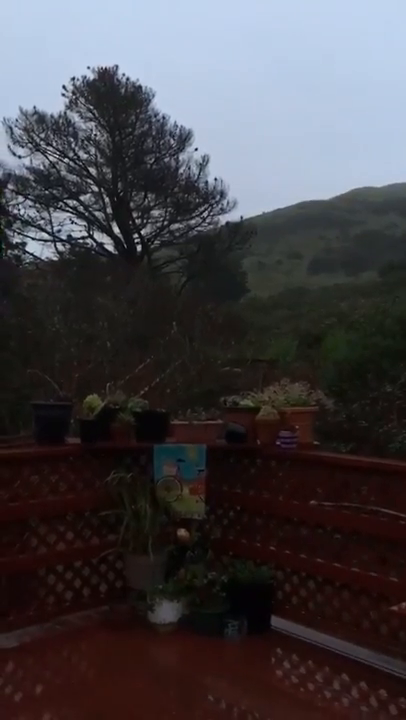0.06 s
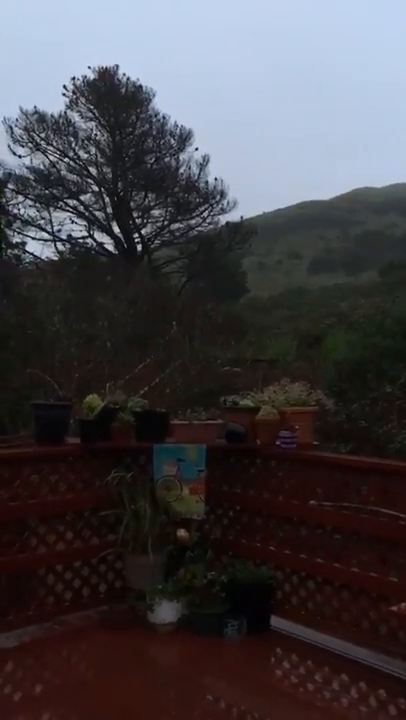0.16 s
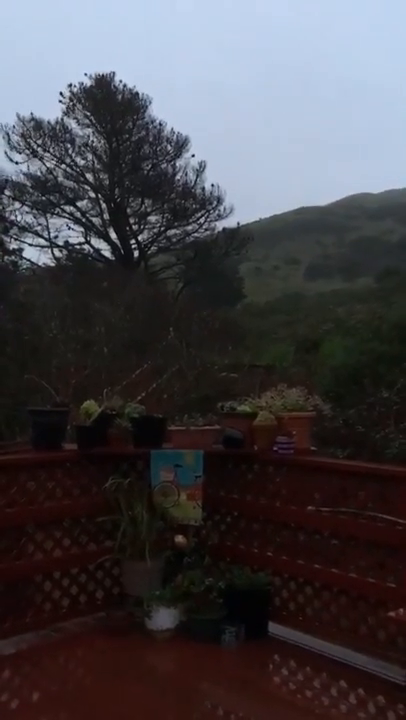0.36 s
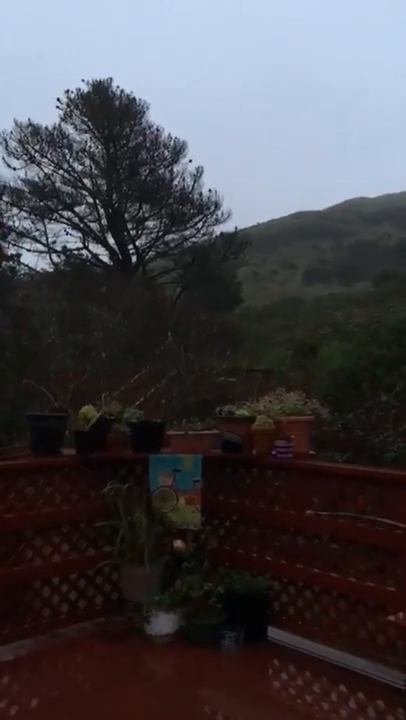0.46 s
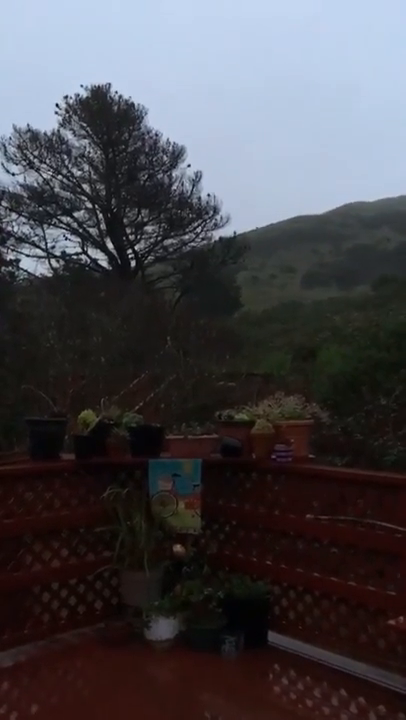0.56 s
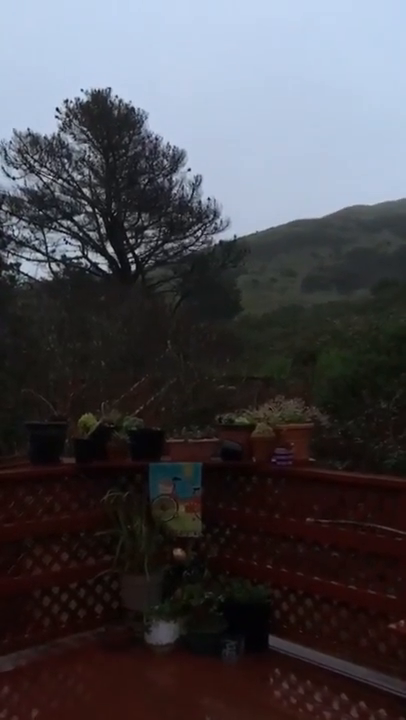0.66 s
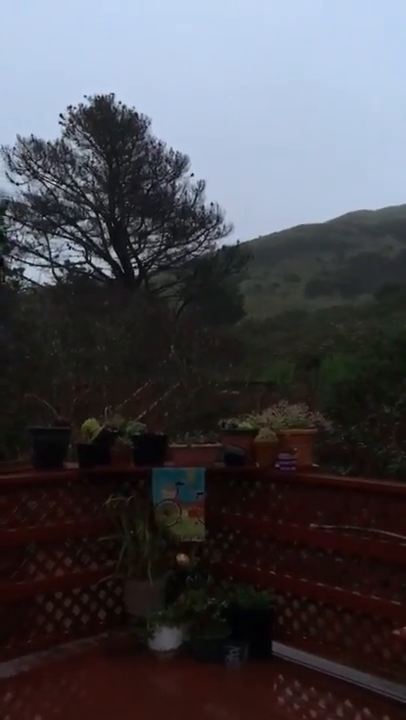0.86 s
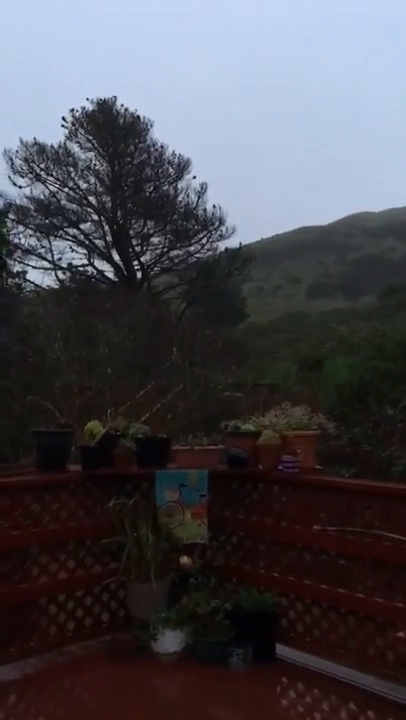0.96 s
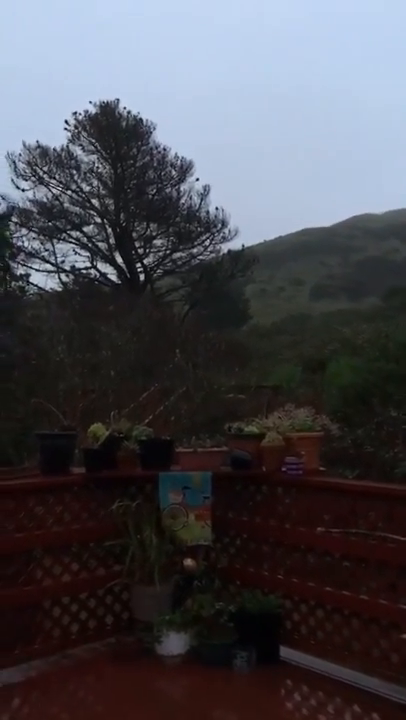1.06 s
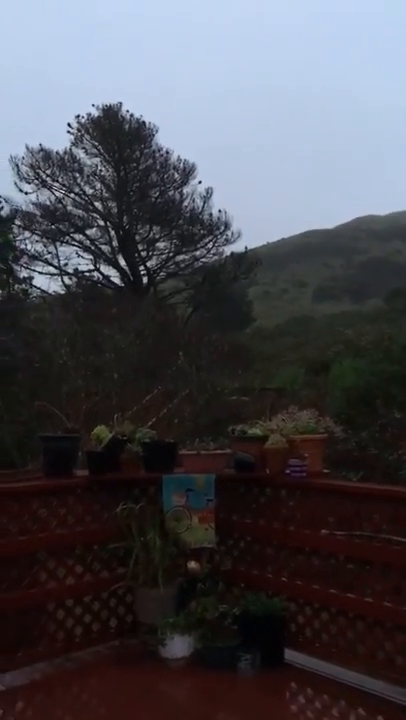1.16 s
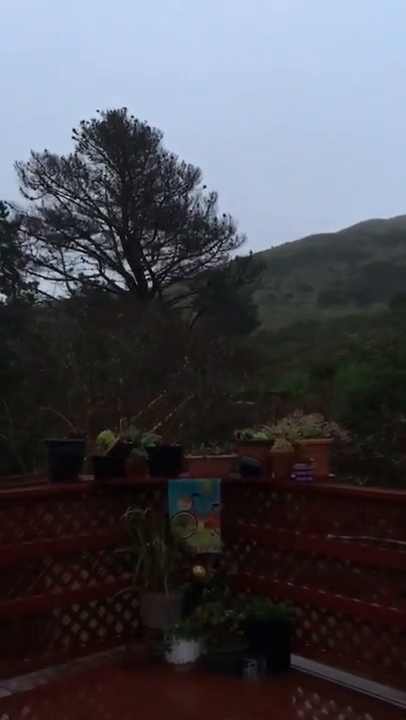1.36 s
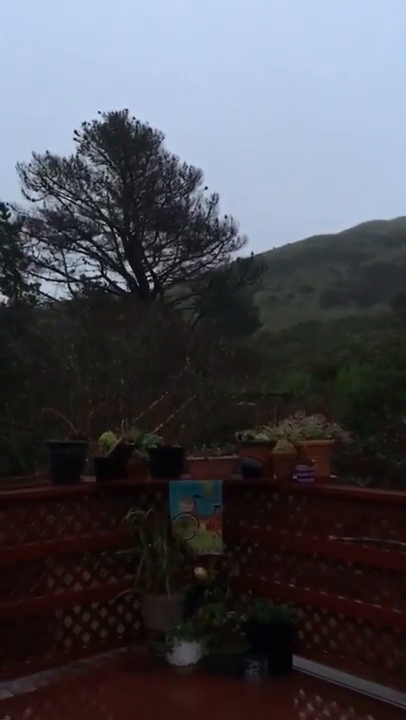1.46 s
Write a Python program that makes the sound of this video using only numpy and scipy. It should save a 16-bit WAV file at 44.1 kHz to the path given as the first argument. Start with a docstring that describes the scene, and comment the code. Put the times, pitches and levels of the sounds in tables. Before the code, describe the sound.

A distant coyote gives one rough bark and a short high howl over steady outdoor hiss.

```python
"""Steady rumble and hiss of open air, then a coyote's one rough bark and a howl across a brushy valley.
Its vocal folds beat unevenly, so the howl opens hoarse and wavering; it cracks, holds a clean high note
and drops away in a yip. The microphone is on a deck, with a faint house hum, a few faint ticks and
a thin high chirp as the bark starts. Deck and trees scatter the call; the hills keep the note ringing."""
import sys
import numpy as np
from scipy import signal
from scipy.fft import rfft, irfft
from scipy.io import wavfile
from scipy.ndimage import uniform_filter1d

SR = 44100
rng = np.random.default_rng(int(sys.argv[2]) if len(sys.argv) > 2 else 0)


def pcm_store(signal):
    """Save signal as 16-bit PCM."""
    levels = np.round(np.clip(np.atleast_2d(signal), -1, 1) * 32767)
    wavfile.write(sys.argv[1], SR, levels.astype(np.int16).T)


N = 66150
T = np.arange(N) / SR


def amp(db):
    """Decibels to amplitude."""
    return 10 ** (np.asarray(db) / 20)


def unit(x):
    """Scales to rms 1."""
    return x / np.sqrt(np.mean(abs(x) ** 2) + 1e-20)


def curve(rows, column=1):
    """One column of a table, joined by straight lines in time."""
    rows = np.array(rows)
    return np.interp(T, rows[:, 0], rows[:, column])


def gain_at(spectrum, hz):
    """Gain of a spectrum table at these frequencies."""
    freq_hz, db = np.transpose(spectrum)
    return amp(np.interp(np.log(hz + 1), np.log(freq_hz + 1), db))


def colour(x, spectrum):
    """Filters by a spectrum table."""
    return irfft(rfft(x) * gain_at(spectrum, np.fft.rfftfreq(len(x), 1 / SR)), len(x))


def wander(hz):
    """Random drift up to about this rate, rms 1."""
    lowpass = np.exp(-.5 * (np.fft.rfftfreq(N, 1 / SR) / hz) ** 2)
    return unit(irfft(rfft(rng.standard_normal(N)) * lowpass, N))


def drifting_phase(hz, drift, drift_hz):
    """Phase of a vibration whose rate strays by the fraction `drift`."""
    return 2 * np.pi * np.cumsum(hz * (1 + drift * wander(drift_hz))) / SR


def gate(rows):
    """1 between the first and last row, with soft edges."""
    return uniform_filter1d(1. * ((T > rows[0][0]) & (T < rows[-1][0])), size=200)


# Open air at the microphone: freq_hz, gain_db
AIR_SPECTRUM = [(18, -33), (43, -1.5), (140, -6), (250, -6.5), (504, -16.5), (800, -13.5), (1220, -15.5),
                (1820, -19), (2380, -17.5), (2750, -25), (3500, -25), (9000, -35.5), (11700, -51)]
def open_air(level_db=-53.5, swell_db=2.5):
    """Uneven low rumble under a steady hiss, all around the deck."""
    air = amp(level_db) * unit(colour(rng.standard_normal(N), AIR_SPECTRUM))
    rumble = signal.sosfiltfilt(signal.butter(2, 294, fs=SR, output="sos"), air)
    hiss = air - rumble
    return rumble * amp(swell_db * wander(hz=8.9)) + hiss


# Hum as it reaches the deck: freq_hz, level_db
HUM_TONES = [(57, -70), (114, -65), (240, -66)]
def house_hum():
    """Faint, wavering low tones from the house."""
    return sum(amp(db) * np.sqrt(2) * np.cos(2 * np.pi * hz * T + 0.6 * wander(hz=5.5))
               for hz, db in HUM_TONES)


# Brief high sounds at the microphone: start_s, level_db, centre_hz, width_hz, decay_s
TREBLE_BURSTS = [(0.095, -60, 5520, 5000, 0.036), (0.182, -61.5, 3740, 550, 0.061),
                 (0.977, -64.5, 7540, 900, 0.04), (1.319, -60.5, 6547, 3000, 0.019)]
def treble_bursts():
    """Faint ticks, and a faint, narrow high chirp at the start of the bark."""
    out = np.zeros(N)
    for start_s, level_db, centre_hz, width_hz, decay_s in TREBLE_BURSTS:
        envelope = (T > start_s) * np.exp(-abs(T - start_s) / decay_s)
        band = unit(wander(width_hz / 2) * np.cos(2 * np.pi * centre_hz * T))
        out += amp(level_db) * envelope * band
    return out


def scatter(x, t60_s, rise_s):
    """A diffuse tail of many small reflections."""
    tail = rng.standard_normal(N) * amp(-60 * T / t60_s) * (1 - np.exp(-(T / rise_s) ** 2))
    return signal.fftconvolve(x, tail / np.linalg.norm(tail))[:N]


# Scatter off the deck and trees near the microphone: freq_hz, gain_db
DECK_SPECTRUM = [(500, -19.5), (800, 0), (1250, -19), (1650, -12), (2500, -10)]
# What the far hills send back, mostly the fundamental: freq_hz, gain_db
HILL_SPECTRUM = [(500, -4), (650, -19.5), (800, -0.5), (1000, -41), (1270, -29.5), (1620, -25), (2450, -21),
                 (4000, -59)]
# Hillside echoes: delay_s, gain_db
HILL_ECHOES = [(.12, -0.5), (.222, -10.5)]
def valley(call):
    """The call reaches the deck directly, then as near scatter, far echoes and a long ring."""
    far = colour(call, HILL_SPECTRUM)
    echoes = sum(amp(db) * np.interp(T - delay_s, T, far, left=0) for delay_s, db in HILL_ECHOES)
    ring = amp(1.5) * scatter(far, t60_s=3.5, rise_s=0.052)
    near = scatter(colour(call, DECK_SPECTRUM), t60_s=0.43, rise_s=0.0048)
    return call + near + echoes + ring


# Fundamental against the second harmonic, at the folds: time_s, gain_db
FUNDAMENTAL = [(.21, 9.5), (.235, 9), (.265, -5.5), (.45, 6), (.48, -7), (.53, -6), (.58, 20), (.6, 8.5),
               (.625, -2), (.665, -16.5), (.697, 8.5), (.72, -4.5), (.85, 0.5), (.94, -1.5), (1.01, -16.5),
               (1.135, 7.5), (1.16, -18), (1.19, -11)]
# Overtones from the third harmonic up: time_s, gain_db
OVERTONES = [(.2, -2.5), (.22, 0.5), (.26, -3), (.45, -1), (.52, -7), (.57, 10.5), (.618, -10.5),
             (.69, 1.5), (.735, -1.5), (.87, 4), (1.06, 4.5), (1.14, 0.5), (1.156, -2.5), (1.187, -4)]
# Alternating strong and weak beats add lines half way between harmonics: time_s, gain_db
PERIOD_DOUBLING = [(.21, -8), (.25, -5), (.4, -14), (.425, -0.5), (.46, -1.5), (.478, -4.5), (.5, 5),
                   (.535, -3.5), (.56, 0.5), (.58, -18), (.615, -41), (1.15, -53.5), (1.187, -13)]
# The mouth changes shape at the crack: time_s, clear_share (0 hoarse to 1 clear)
MOUTH_SHAPE = [(.57, 0), (.62, 1)]
# Throat and mouth in the bark and hoarse opening: freq_hz, gain_db
HOARSE_THROAT = [(350, -52), (560, -5), (850, -15.5), (1120, -1.5), (1270, 4.5), (1580, -0.5), (1800, -4.5),
                 (1970, -10.5), (2420, -9.5), (2570, -23.5), (3000, -44.5), (4500, -72)]
# Throat and mouth in the clean note and yip: freq_hz, gain_db
CLEAR_THROAT = [(790, -12.5), (1050, -7), (1270, 2), (1600, 0), (1950, -20.5), (2420, -10), (2620, -10),
                (3080, -58), (4500, -80.5)]
def vocal_folds(pitch_hz, phase, roughness, rasp_db=-1.5, rasp_hz=113):
    """Harmonics and half lines of the beating folds, shaped by the throat and mouth."""
    fundamental, overtones = amp(curve(FUNDAMENTAL)), amp(curve(OVERTONES))
    doubling = amp(curve(PERIOD_DOUBLING))
    clear = np.clip(curve(MOUTH_SHAPE), 0, 1)
    out = np.zeros(N)
    for k in np.arange(2, 12) / 2:
        hz = k * pitch_hz
        throat = (1 - clear) * gain_at(HOARSE_THROAT, hz) + clear * gain_at(CLEAR_THROAT, hz)
        strength = fundamental if k == 1 else overtones if k >= 3 else 1
        gain = strength * (doubling if k % 1 else 1) * throat
        depth = amp(rasp_db) * roughness * (k / 2) ** 2  # high partials break up first
        rasp = (1 + depth * (wander(rasp_hz) + 1j * wander(rasp_hz))) / np.sqrt(1 + 2 * depth ** 2)
        partial = np.exp(1j * (k * phase + 2 * np.pi * rng.random()))
        out += np.sqrt(2) * gain * (rasp * partial).real
    return out


JITTER_HZ, FLUTTER_HZ = 121, 121.74
def voice(pitch_hz, effort_db, roughness):
    """The coyote's voice: roughness adds jitter, rasp, pulsed breath and the flutter of loose tissue."""
    phase = drifting_phase(pitch_hz, drift=0.0302 * roughness, drift_hz=JITTER_HZ)
    tone = vocal_folds(pitch_hz, phase, roughness)
    breath = unit(colour((1 + np.cos(phase)) * rng.standard_normal(N), HOARSE_THROAT))
    flap_phase = drifting_phase(FLUTTER_HZ, drift=0.11, drift_hz=FLUTTER_HZ / 2)
    flutter = 1 + 0.42 * roughness * np.cos(flap_phase)
    return amp(effort_db) * flutter * (tone + roughness * breath)


# The bark, from across the valley: time_s, pitch_hz, effort_db, roughness (0-1)
BARK_SHAPE = [(.186, 640, -60, 0.61), (.194, 640, -51.5, 0.48), (.208, 547.5, -49, 0),
              (.228, 626.2, -43, 0.28), (.248, 640, -39.5, 0.26), (.266, 662.2, -36.5, 0.5),
              (.277, 611, -38.5, 0.5), (.289, 665, -48, 0.77), (.299, 668, -44, 0.8), (.332, 661, -68.5, 1)]
def bark():
    """One short, rough burst of voice."""
    return gate(BARK_SHAPE) * voice(curve(BARK_SHAPE), curve(BARK_SHAPE, 2), curve(BARK_SHAPE, 3))


# Lines between the harmonics in the crack: pitch_multiple, gain_db
CRACK_PARTIALS = [(4 / 3, -17), (5 / 3, 0), (7 / 3, -23), (8 / 3, -13)]
# Rise and fall of the crack: time_s, level_db
CRACK_LEVEL = [(.562, -75), (.576, -33.5), (.587, -30.5), (.599, -36), (.612, -70)]
def crack(pitch_hz):
    """The voice breaks: for a moment the folds repeat every third beat."""
    phase = drifting_phase(pitch_hz, drift=0.0041, drift_hz=JITTER_HZ)
    lines = sum(amp(db) * np.cos(k * phase + 2 * np.pi * rng.random()) for k, db in CRACK_PARTIALS)
    return gate(CRACK_LEVEL) * amp(curve(CRACK_LEVEL)) * np.sqrt(2) * lines


# The howl, from the same distance: time_s, pitch_hz
HOWL_MELODY = [(.37, 658.8), (.412, 606.4), (.435, 671.7), (.456, 692.4), (.47, 666), (.485, 614.3),
               (.503, 597.5), (.52, 604), (.545, 712.5), (.6, 763.5), (.66, 767.3), (.693, 789.2),
               (.78, 795.5), (.875, 810.2), (1.115, 815.2), (1.15, 802), (1.162, 660.5), (1.175, 597.3),
               (1.195, 474.6)]
# The push behind the howl: time_s, effort_db, roughness (0-1)
HOWL_DRIVE = [(.368, -50.5, 0.57), (.408, -46.5, 0.72), (.425, -40, 0.33), (.455, -38, 0.09),
              (.476, -35, 0.13), (.497, -40, 0.13), (.531, -37, 0.13), (.556, -41, 0.1),
              (.568, -50.5, 0.15), (.588, -47.5, 0.25), (.612, -35.5, 0), (.65, -36, 0.04),
              (.692, -39, 0.01), (.73, -35.5, .01), (.85, -39, 0), (.876, -40, 0), (.96, -38, 0),
              (1.1, -40, 0), (1.15, -38, 0.09), (1.167, -29.5, 0), (1.177, -33, 0.03), (1.205, -58.5, 0.5)]
def howl():
    """Hoarse opening, a crack into the clean note, and the falling yip."""
    pitch_hz = curve(HOWL_MELODY)
    return crack(pitch_hz) + gate(HOWL_DRIVE) * voice(pitch_hz, curve(HOWL_DRIVE), curve(HOWL_DRIVE, 2))


def scene():
    """One microphone on the deck: the distant coyote over the background."""
    return (valley(bark() + howl()) + open_air() + house_hum() + treble_bursts())[None]


def record(dry, cutoff_hz=9250):
    """The recorder's band limit takes off the top treble."""
    lowpass = signal.firwin(401, cutoff_hz, window=("kaiser", 8), fs=SR)
    return signal.oaconvolve(dry, lowpass[None], "same")


dry = scene()
out = record(dry)
pcm_store(out)
```